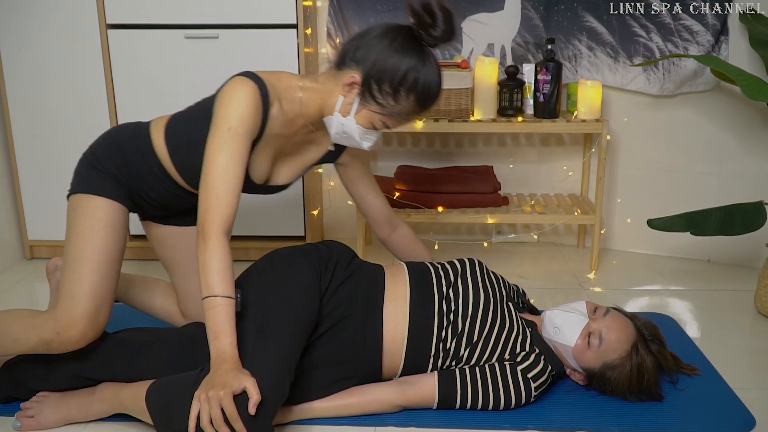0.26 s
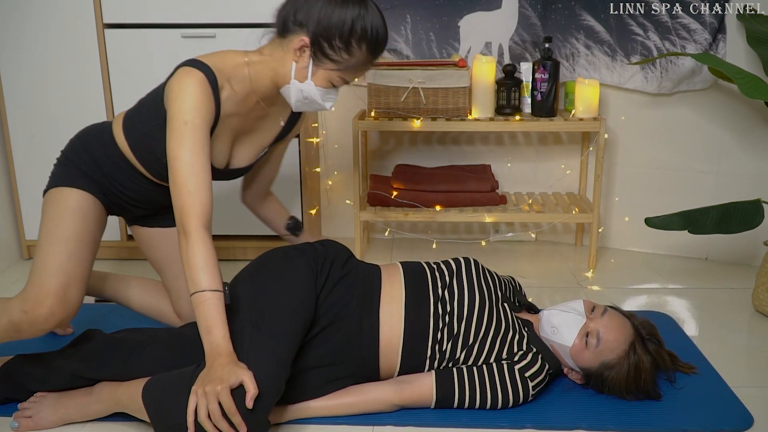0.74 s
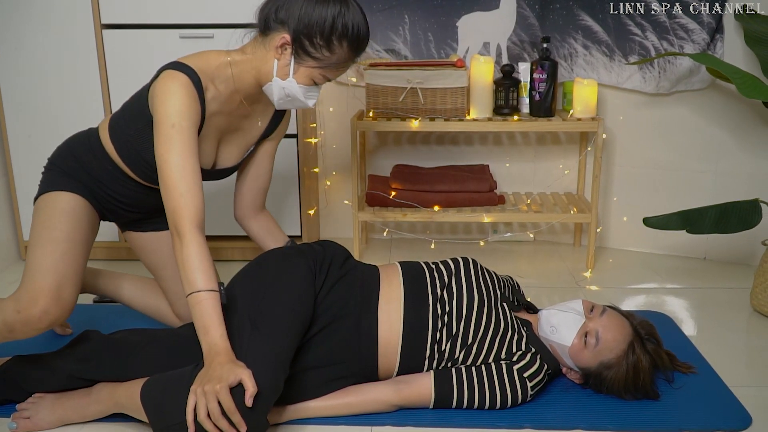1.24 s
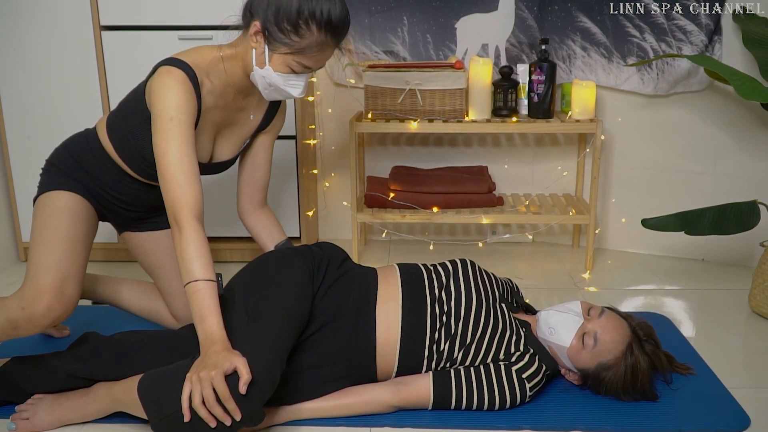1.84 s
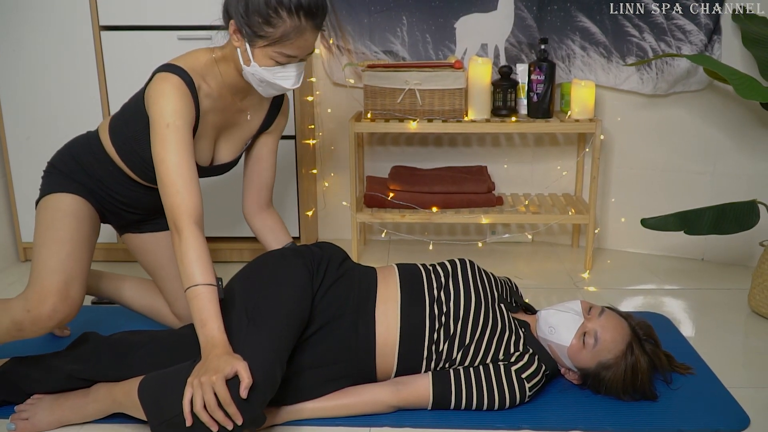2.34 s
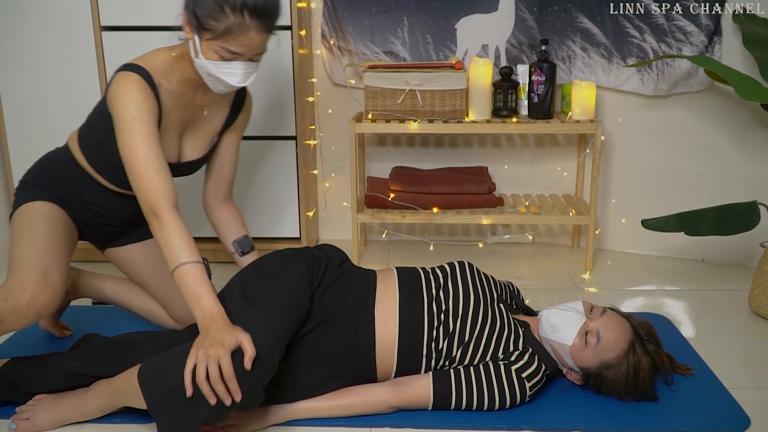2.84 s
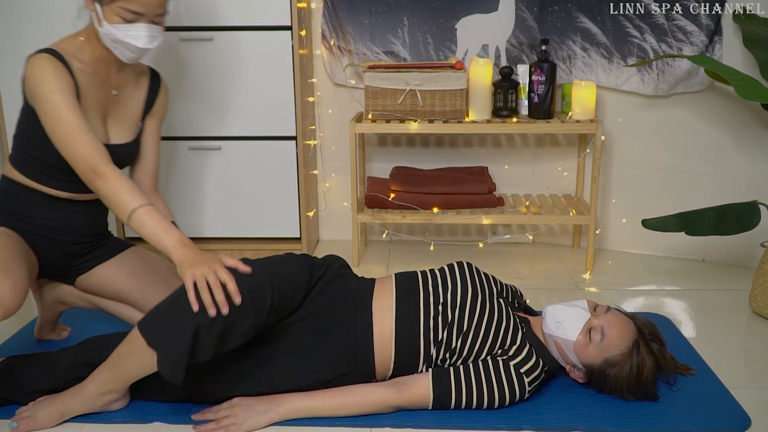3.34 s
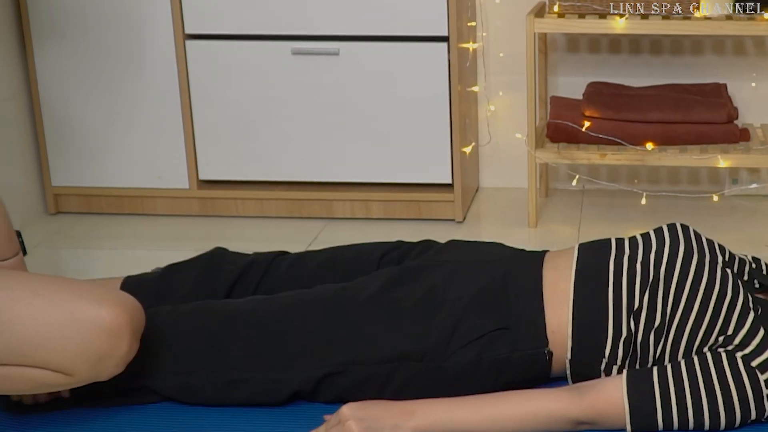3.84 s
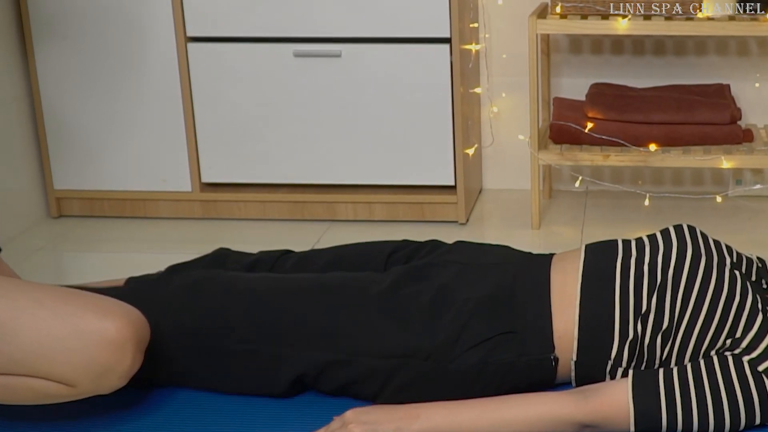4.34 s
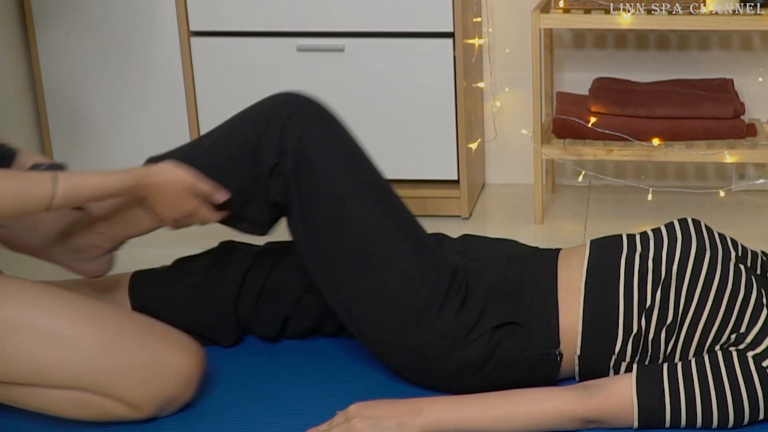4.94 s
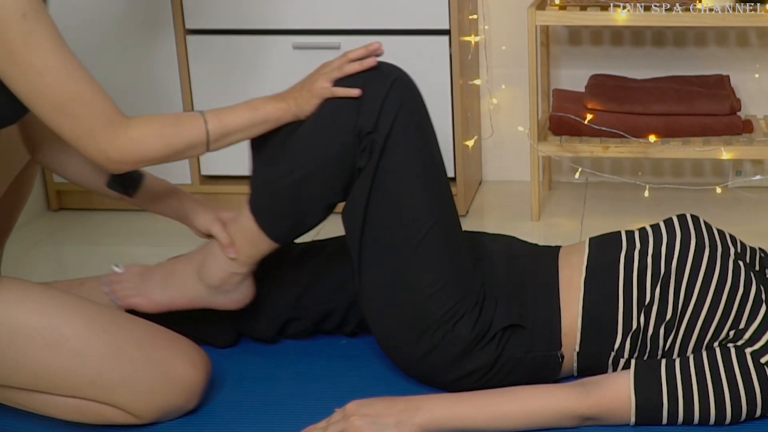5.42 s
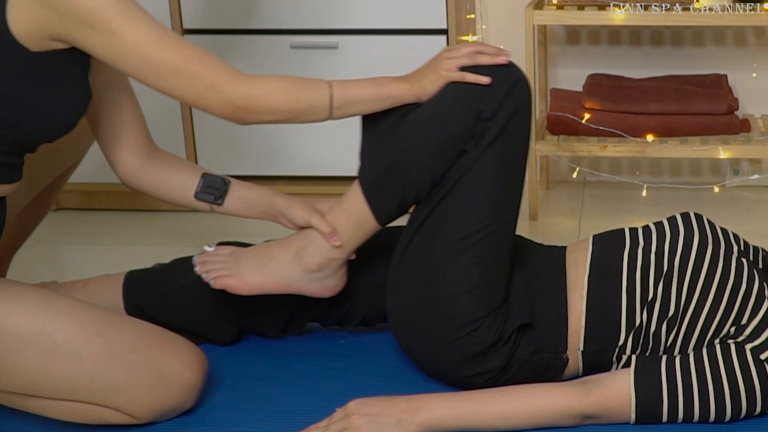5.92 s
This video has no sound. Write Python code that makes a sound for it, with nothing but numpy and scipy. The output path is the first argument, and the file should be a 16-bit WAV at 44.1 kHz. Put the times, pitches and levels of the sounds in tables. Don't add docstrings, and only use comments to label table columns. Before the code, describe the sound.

Close stereo in a small hard-surfaced room: low mains hum, soft air and hiss. Massage slaps come first, four thick fleshy smacks leaning left, each with a brief reverberant answer. Then the background jumps up at a cut with dull knocks; clothing drags over cloth and mat in quick scuffs, a fuller swish follows as a leg is raised, and ticks and one-sided pops end it.

```python
import sys
import numpy as np
from scipy import signal
from scipy.fft import rfft, irfft, next_fast_len
from scipy.io import wavfile
from scipy.ndimage import uniform_filter1d, map_coordinates

SR = 44100
rng = np.random.default_rng(int(sys.argv[2]) if len(sys.argv) > 2 else 0)


def makeup_ratio(level_db):
    decades = np.asarray(level_db, float) / 20
    return 10 ** decades


def log_audio(samples):
    frames = np.atleast_2d(samples).T
    limited = np.clip(frames, -1, 1)
    pcm = np.round(limited * 32767).astype(np.int16)
    wavfile.write(sys.argv[1], SR, pcm)


N = 272273

TAKE_START_S = [0, .076, 3.6348]
# (drone [dB], air [dB], hiss [dB], resting cloth [dB])
TAKE_LEVELS = [
    (-50.5, -56, -56.5, -64),
    (-67, -67.5, -69, -86),
    (-51.5, -53, -62, -60.5),
]
# (time [s], level [dB])
DRONE_LOAD = [(0, 4), (.45, 4), (2.2, 4), (2.6, 2), (3.25, -3.5), (3.45, 2), (3.75, 4.5), (3.88, -4.5),
              (4.25, 5), (4.4, -5), (4.77, -1.5), (5.02, -1.5), (5.46, -7.5), (5.7, 0.5), (5.9, -10.5),
              (6.18, -1)]
# (frequency [Hz], density [dB/Hz])
AIR_COLOUR = [(12, -49), (20, -4.5), (65, -5.5), (102, -5.5), (156, -5.5), (221, -6), (270, -11), (302, -6),
              (420, -7.5), (523, -9), (688, -10), (940, -31.5), (1600, -23.5), (2080, -71), (3520, -120)]
# (frequency [Hz], width [Hz], level [dB])
AIR_MODES = [(216, 21, -6), (245, 15.6, 4.5), (293, 2, 11.5), (354.4, 4.8, -6), (540, 16, -8.5)]
# (frequency [Hz], density [dB/Hz])
HISS_COLOUR = [(530, -17), (900, -1.5), (1410, -9.5), (1990, -14), (4950, -23), (7760, -29), (12300, -32.5),
               (13400, -54), (16500, -47)]
# (frequency [Hz], correlation [0-1])
LIKENESS = [(60, 0.84), (150, 0.78), (380, 0.55), (950, 0), (15000, 0)]
# (middle [s], length [s], frequency [Hz], width [Hz], level [dB])
FOAM_RUBS = [(0.878, .25, 706, 502, -68), (2.897, 0.64, 611, 70, -66), (3.87, 0.054, 860, 250, -47.5),
             (4.054, 0.047, 724, 250, -39.5), (4.154, 0.019, 1060, 300, -34),
             (4.183, 0.051, 780, 250, -35.5), (4.75, 0.72, 540, 79.6, -56), (5.019, 0.095, 323, 120, -48),
             (5.189, 0.085, 397, 150, -50), (5.37, 0.057, 127, 60, -45), (5.602, 0.75, 300, 29.7, -53),
             (5.85, 0.52, 1590, 1100, -56), (3.658, .021, 150, 110, -39), (4.25, 0.047, 583, 250, -42.5),
             (4.31, 0.037, 112, 50, -46), (4.39, 0.082, 112, 50, -46.5), (4.79, 0.046, 105, 50, -47),
             (4.96, .025, 277, 130, -50), (5.02, .11, 2400, 900, -52.5), (3.31, .012, 2260, 1500, -67),
             (3.583, .008, 2410, 1100, -66), (5.098, 0.013, 3980, 3000, -45)]
# (loudest [s], rise [s], fall [s], level [dB], brightness [dB])
CLOTH_STROKES = [(0.086, 0.0074, 0.044, -63.5, -14), (.193, .012, 0.058, -73, -9),
                 (.41, 0.11, 0.1, -72.5, -5.5), (.49, 0.024, 0.019, -83, -4), (.70, 0.064, .05, -83, .1),
                 (.85, 0.12, 0.13, -84.5, -26), (2.46, 0.029, 0.14, -70, -3),
                 (2.59, 0.011, 0.028, -72, -13), (2.71, 0.068, 0.099, -73, -9),
                 (3.07, 0.27, 0.93, -71, -1.6), (3.42, 0.44, 0.36, -73, -6), (3.655, 0.033, 0.04, -44, -17),
                 (3.72, 0.035, 0.33, -52.5, -7.5), (3.866, 0.043, 0.11, -49, -4),
                 (4.03, 0.066, 0.1, -48, -10.5), (4.145, 0.025, 0.036, -41, -5),
                 (4.184, 0.038, 0.066, -39, -9.5), (4.3, 0.06, .12, -59.5, -3.5),
                 (4.602, 0.048, 0.018, -57, 8.5), (4.7, 0.087, 0.63, -69.5, 5.5),
                 (5.041, 0.13, 0.062, -48.5, -1.5), (6.04, 0.062, 0.06, -60, -1.5),
                 (6.16, 0.07, .11, -58, -1.5)]
# (time [s], left-right [dB])
CLOTH_PLACE = [(0, 8.5), (.26, 7.5), (.42, 17.5), (.7, -8), (2.2, -3), (2.52, 12), (2.75, -5), (3.1, 2.7),
               (3.55, -6.5), (3.7, 0.3), (6.18, .6)]
# (frequency [Hz], density [dB/Hz])
WEAVE_COLOUR = [(1120, -12), (1900, -4.5), (2330, -2.5), (3510, -1.5), (5250, -5.5), (8000, -14),
                (10400, -65), (17600, -120)]
# (frequency [Hz], density [dB/Hz])
FIBRE_COLOUR = [(2240, -46), (3800, -10), (4650, -2.5), (8550, -9.5), (14900, -26.5), (16000, -34),
                (16500, -60)]
# (frequency [Hz], density [dB/Hz])
MAT_COLOUR = [(280, -38), (480, -1.5), (593, 2.5), (723, -1), (839, -2.5), (1070, -4.5), (1150, -5.5),
              (2600, -14.5), (3380, -72), (5720, -120)]
# (time [s], peak [dB], ring [Hz], t60 [s], left-right [dB])
SEAM_TICKS = [(0.19, -53, 1600, 0.008, 7), (0.1906, -58, 7500, 0.0052, -2), (0.067, -43, 1100, 0.01, 3),
              (0.3984, -58, 1700, 0.0094, 6), (0.486, -55.5, 4830, 0.0093, 13),
              (0.754, -58, 2800, 0.054, 1.5), (2.579, -56.5, 3600, 0.022, 3),
              (2.6232, -56, 1130, 0.012, -5), (2.647, -56, 1210, 0.0072, -2), (4.882, -46, 3600, 0.011, 0),
              (5.1798, -45, 8900, 0.0099, 2), (5.315, -49, 2200, 0.0088, 0),
              (6.002, -44.5, 7300, 0.013, -1), (6.0412, -37, 6700, 0.016, 3)]
# (time [s], peak [dB], left-right [dB], crack [dB], crack [Hz])
HARD_KNOCKS = [
    (3.6352, -22.5, 5.5, -14, 2980),
    (3.645, -12.5, 5.5, -6, 6600),
    (3.67, -14.5, 5, -3, 4400),
    (6.0794, -25, 24, -24, 4530),
]
# (time [s], peak [dB], signed width [s], left-right [dB])
STATIC_POPS = [
    (.5797, -16.3, -3.4e-5, 50),
    (3.8990, .4, 3.8e-5, -50),
    (4.1352, -18, -3.6e-5, -50),
    (6.0801, -14, -4e-5, 30),
    (6.08021, -9, 4e-5, 30),
]
# (time [s], peak [dB], thud [dB], crispness [dB/octave], contact [s])
SLAP_EVENTS = [
    (1.0270, -20, 0, -1.2, 0.0105),
    (1.409, -20, -4, -0.2, 0.0067),
    (1.8088, -22, -5.5, -1, 0.0075),
    (2.2684, -15.5, -16.5, -2, 0.0066),
]
# (tail [dB], brightness [dB], build-up [s], floor push [dB], push delay [s])
SLAP_ANSWERS = [
    (-33, -1, 0.015, -19, .036),
    (-35, -1.5, 0.016, -32, 0.034),
    (-40, 3, 0.0037, -31, 0.023),
    (-39, 1.5, 0.032, -13.5, .0175),
]
# (frequency [Hz], width [Hz], gain over the rest [ratio])
PALM_CUPS = [
    [(5000, 500, 1.1), (6900, 600, .8)],
    [(7500, 700, 1.8), (4600, 300, .6)],
    [(6550, 300, 1.6), (4200, 500, .5)],
    [(6000, 300, 2.2), (8600, 350, 2.2), (4300, 400, 1.1), (10300, 400, 1.1)],
]
# (frequency [Hz], density [dB/Hz])
PALM_COLOUR = [(180, -12), (300, -6.5), (1110, -7), (2280, -15), (3300, -13.5), (6240, -23.5), (7500, -23),
               (14400, -39), (16500, -70)]
# (frequency [Hz], t60 [s])
TILE_T60 = [(100, 0.71), (260, 0.52), (700, 0.53), (1800, 0.41), (5000, 0.5), (12000, 0.37)]
# (frequency [Hz], density [dB/Hz])
WALL_COLOUR = [(24, -52), (40, -52), (194, -2), (297, -5), (354, -4.5), (600, -9.5), (715, -5),
               (918, -13.5), (1520, -19.5), (2440, -27), (5050, -33), (7360, -35.5), (16000, -56.5)]
# (frequency [Hz], level [dB], t60 [s])
SLAP_MODES = [(188, 10.5, 0.15), (210, -5, 1), (239.4, 0, 0.36), (300, -14, 0.98), (344.6, -5, 0.63),
              (140, -2, 0.13), (687, -3, 0.36)]

SETTLE_DB, SETTLE_S = 6, 0.23
REST_BRIGHT_DB = -10.5
MAT_DB, MAT_DULL = -4, 0.63
KNOCK_HZ, KNOCK_T60_S = 900, 0.0065
THUD_HZ, SHADOW_DB, MODE_DB = 267, -21, -0.5
OVERLOAD = 0.215
OPPOSITE = np.array([[1], [-1]])


def unit(x):
    return x / np.sqrt(np.mean(x ** 2) + 1e-20)


def along(points, hz):
    f, v = np.transpose(points)
    return np.interp(np.log(hz + 1), np.log(f + 1), v)


def curve(rows):
    return np.interp(np.arange(N) / SR, *np.transpose(rows))


def take_at(s):
    return np.searchsorted(TAKE_START_S, s, side="right") - 1


def wobble(rate_hz):
    knots = rng.standard_normal(int(N * rate_hz / SR) + 4)
    return map_coordinates(knots, [np.arange(N) * rate_hz / SR])


def filtered(x, response):
    m = next_fast_len(x.shape[-1] + 8192)
    return irfft(rfft(x, m) * response(np.fft.rfftfreq(m, 1 / SR)), m)[..., :x.shape[-1]]


def resonance(f, hz, width_hz):
    return 1j * f * width_hz / (hz * hz - f * f + 1j * f * width_hz)


def swing(t, hz, t60):
    t = np.clip(t, 0, 1)
    return np.sin(2 * np.pi * hz * t) * makeup_ratio(-60 * t / t60)


def spaced(pair, gain):
    turn = lambda hz: np.arccos(np.clip(along(LIKENESS, hz), -1, 1)) / 2
    mid, side = filtered(pair, lambda hz: gain(hz) * [np.cos(turn(hz)), np.sin(turn(hz))])
    return np.array([mid + side, mid - side])


def rush(gain, patchy_db):
    z = signal.stft(rng.standard_normal((2, N)), nperseg=512)[2]
    field = uniform_filter1d(rng.standard_normal(z.shape[1:]), 6, 0)
    field = uniform_filter1d(field, 8, 1)
    noise = signal.istft(z * makeup_ratio(patchy_db * unit(field)), nperseg=512)[1][:, :N]
    return unit(spaced(noise, gain))


def add(track, s, x):
    part = track[:, round(s * SR):][:, :x.shape[1]]
    part += x[:, :part.shape[1]]


def room_tone():
    t = np.arange(N) / SR
    drone_db, air_db, hiss_db, _ = np.array(TAKE_LEVELS)[take_at(t)].T
    since_cut = t - np.take(TAKE_START_S, take_at(t))
    air_db = air_db + SETTLE_DB * np.exp(-since_cut / SETTLE_S)

    mains_hz = 99.8 + 1.46 * wobble(8.8)
    mains = np.sqrt(2) * np.sin(2 * np.pi * np.cumsum(mains_hz) / SR)
    halo = rush(lambda f: resonance(f, 100, width_hz=24) ** 2, patchy_db=1.5)
    drone = makeup_ratio(drone_db + curve(DRONE_LOAD) - 1.5) * (mains + makeup_ratio(-0.5) * halo)

    modes = lambda f: sum(makeup_ratio(db) * resonance(f, hz, w) for hz, w, db in AIR_MODES)
    held = lambda f: makeup_ratio(along(AIR_COLOUR, f)) * (1 + modes(f))
    air = makeup_ratio(air_db + 3.45 + 1.15 * wobble(7.1)) * rush(held, patchy_db=-1.0)
    hiss = makeup_ratio(hiss_db) * rush(lambda f: makeup_ratio(along(HISS_COLOUR, f)), patchy_db=-2.1)
    return (drone + air) * makeup_ratio(1.2 * OPPOSITE) + hiss


def pops():
    out, t = np.zeros((2, N)), (np.arange(200) - 20) / SR
    for s, db, width, pan_db in STATIC_POPS:
        rebound = 0.0043 * (t > 0) * np.exp(-np.abs(t) / 0.00047)
        spike = np.exp(-(t / width) ** 2) - rebound
        sides_db = db + np.minimum([pan_db, -pan_db], 0)
        add(out, s - 20 / SR, np.outer(makeup_ratio(sides_db), np.sign(width) * spike))
    return out


def ticks():
    out, t = np.zeros((2, N)), np.arange(SR // 25) / SR
    for s, db, hz, t60, pan_db in SEAM_TICKS:
        puff = rng.standard_normal((2, len(t))) * makeup_ratio(-60 * t / t60) * (1 - np.exp(-t / 0.00051))
        puff = filtered(puff, lambda f: resonance(f, hz, 0.23 * hz))
        add(out, s, makeup_ratio(db + 7.0 + 0.5 * OPPOSITE * pan_db) * puff / np.abs(puff).max())
    for s, db, pan_db, crack_db, crack_hz in HARD_KNOCKS:
        ring = swing(t, KNOCK_HZ, KNOCK_T60_S) * (1 - np.exp(-t / 0.0014))
        crack = rng.standard_normal((2, len(t))) * makeup_ratio(crack_db - 60 * t / (1.24 * KNOCK_T60_S))
        crack = filtered(crack, lambda f: resonance(f, crack_hz, width_hz=2160) / (1 + 1j * f / 9000) ** 2)
        add(out, s, makeup_ratio(0.5 * OPPOSITE * pan_db) * makeup_ratio(db + 5.5) * (ring + crack))
    return out


def rubs():
    out, t = np.zeros((2, N)), np.arange(SR) / SR - .5
    for s, length, hz, width_hz, db in FOAM_RUBS:
        swell = np.exp(-(2 * t / length) ** 2)
        pair = rng.standard_normal((2, SR))
        band = spaced(pair, lambda f: resonance(f, hz, width_hz) ** 2) * swell
        add(out, s - .5, makeup_ratio(db) * unit(band) * np.sqrt(np.mean(swell ** 2)))
    return out


def strokes():
    t = np.arange(N) / SR
    layers = lambda db, bright_db: makeup_ratio(2 * np.array([db, db + bright_db, db + MAT_DB - MAT_DULL * bright_db]))
    power = layers(np.array(TAKE_LEVELS)[take_at(t), 3], REST_BRIGHT_DB)
    for s, rise, fall, db, bright_db in CLOTH_STROKES:
        shape = np.exp(-np.where(t < s, ((t - s) / rise) ** 2, (t - s) / fall))
        shape = shape * (take_at(t) == take_at(s))
        power = power + np.outer(layers(db, bright_db), shape ** 2)
    return np.sqrt(power)


def cloth():
    swish, fine, scuff = strokes()
    catch = wobble(45) + 0.67 * wobble(350)
    weave = rush(lambda f: makeup_ratio(along(WEAVE_COLOUR, f)), patchy_db=0.5)
    weave = swish * makeup_ratio(1.0) * unit(makeup_ratio(0.65 * catch) * weave)
    fibre = rush(lambda f: makeup_ratio(along(FIBRE_COLOUR, f)) * (f / (f + 2500)) ** 3, patchy_db=1.5)
    fibre = fine * makeup_ratio(4.0) * unit(makeup_ratio(1.0 * catch) * fibre)
    mat = rush(lambda f: makeup_ratio(along(MAT_COLOUR, f)), patchy_db=2.0)
    mat = scuff * makeup_ratio(-0.88) * unit(makeup_ratio(2.8 * wobble(30)) * mat)
    return (weave + fibre + mat) * makeup_ratio(np.outer([.5, -.5], curve(CLOTH_PLACE)) + 2.0)


def room(colour, build_s):
    hz, t, z = signal.stft(rng.standard_normal((2, SR * 3 // 4)), SR, nperseg=256)
    decay = makeup_ratio(-60 * t / along(TILE_T60, hz)[:, None])
    tail = spaced(signal.istft(z * decay, SR, nperseg=256)[1], colour)
    t = np.arange(tail.shape[1]) / SR
    tail = tail * (1 - 0.8 * np.exp(-(t / build_s) ** 2)) * (1 - np.exp(-t / 0.0015))
    return tail / np.std(tail[:, :SR // 10])


def ringing(build_s):
    t = np.arange(SR * 3 // 4) / SR
    chance = rng.standard_normal((len(SLAP_MODES), 2, 2, 1))
    modes = 0
    for (hz, db, t60), (strength, phase) in zip(SLAP_MODES, chance):
        modes = modes + makeup_ratio(db + 2.1 * strength - 60 * t / t60) * np.sin(2 * np.pi * hz * t + 1.45 * phase)
    return modes * (1 - np.exp(-t / build_s))


def slaps():
    out, t = np.zeros((2, N)), np.arange(SR // 10) / SR
    for (s, db, thud_db, crisp_db, contact), answer, bands in zip(SLAP_EVENTS, SLAP_ANSWERS, PALM_CUPS):
        tail_db, bright_db, build, push_db, push_s = answer
        cups = lambda f: 1 + sum(gain * resonance(f, hz, w) for hz, w, gain in bands)
        palm = lambda f: makeup_ratio(along(PALM_COLOUR, f) + crisp_db * np.log2(f / 700 + 0.2)) * cups(f)
        swell = np.clip(t / contact, 0, 1)
        burst = filtered(rng.standard_normal(len(t)), palm) * np.sin(np.pi * swell ** 1.67) ** 0.54
        flesh = swing(t - .75 * contact, THUD_HZ, t60=.015)
        blow = makeup_ratio(db + 10.0) * (burst / np.abs(burst).max() - makeup_ratio(thud_db + 8.5) * flesh)

        shadowed = filtered(np.roll(blow, 48), lambda f: makeup_ratio(SHADOW_DB) / (1 + 1j * f / 800) ** 3)
        push_rise = 1 - np.exp(-np.clip(t - push_s, 0, 1) / 0.0028)
        push = makeup_ratio(push_db) * swing(t - push_s, 96, t60=0.061) * push_rise
        right = shadowed + 0.056 * push - makeup_ratio(db + thud_db - 13) * np.roll(flesh, 70)
        add(out, s - .003, np.array([blow + push, right]))

        tilt = lambda f: bright_db * np.clip(np.log2(f / 700 + 1e-3), 0, 1.5)
        mode_gap = lambda f: 1 - 0.44 * resonance(f, 432, width_hz=89)
        colour = lambda f: makeup_ratio(along(WALL_COLOUR, f) + tilt(f)) * cups(f) * mode_gap(f)
        add(out, s + 0.0009, makeup_ratio(tail_db + 1.1 * OPPOSITE) * room(colour, build))
        add(out, s + 0.00505, makeup_ratio(tail_db + MODE_DB + 2.2 * OPPOSITE) * ringing(build_s=0.0019))
    return out


def scene():
    blows = slaps()
    overloaded = blows / (1 + np.abs(blows / OVERLOAD) ** 6) ** (1 / 6)
    overloaded = filtered(overloaded, lambda f: (1j * f / (45 + 1j * f)) ** 2)
    return overloaded + cloth() + room_tone() + ticks() + pops() + rubs()


def roll_off(x):
    return signal.sosfilt(signal.butter(12, 16660, fs=SR, output="sos"), x)


def record(dry):
    band = filtered(dry, lambda f: (1j * f / (35 + 1j * f)) ** 2 * (f < 16550))
    return roll_off(band)


dry = scene()
out = record(dry)
log_audio(out)
```